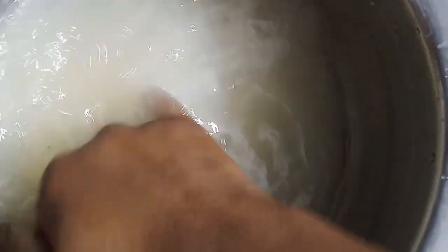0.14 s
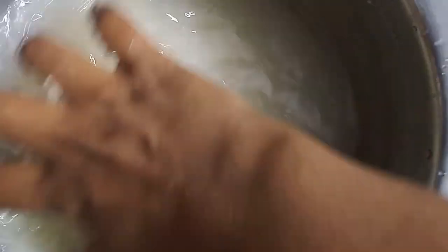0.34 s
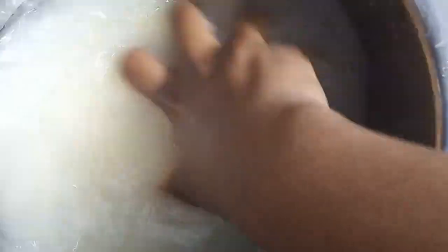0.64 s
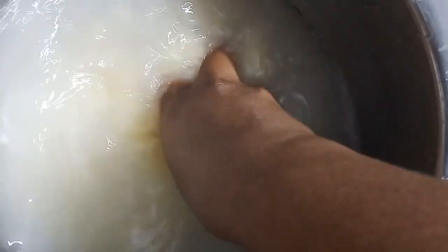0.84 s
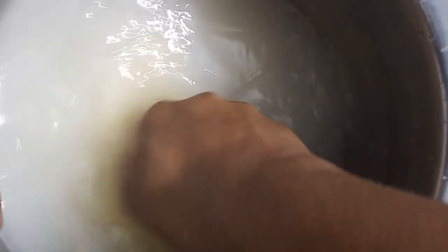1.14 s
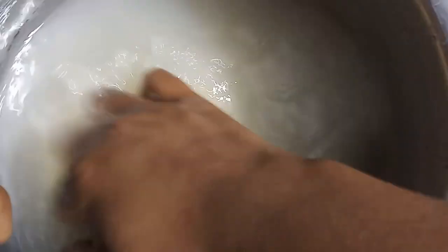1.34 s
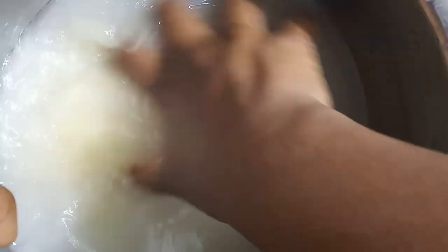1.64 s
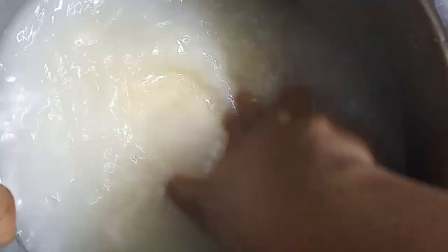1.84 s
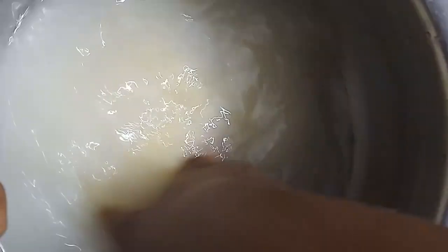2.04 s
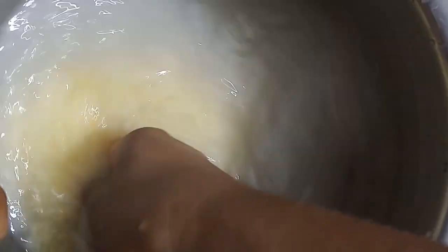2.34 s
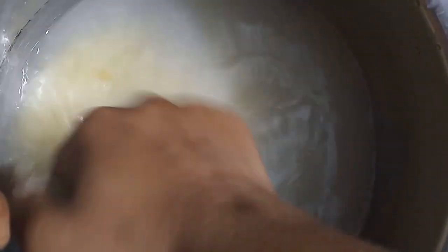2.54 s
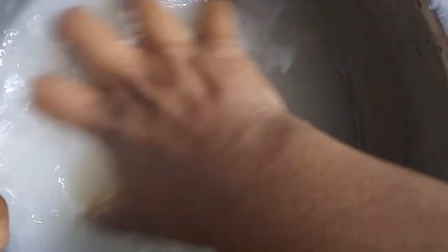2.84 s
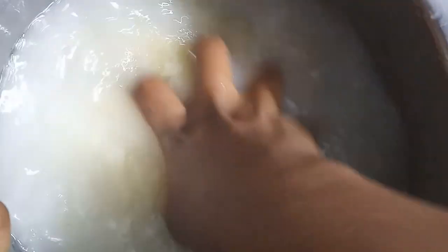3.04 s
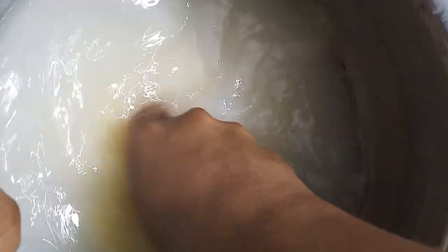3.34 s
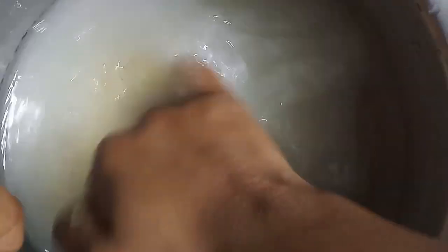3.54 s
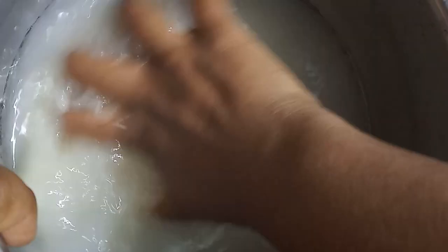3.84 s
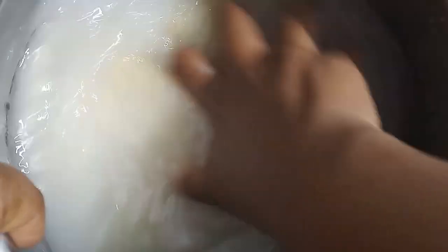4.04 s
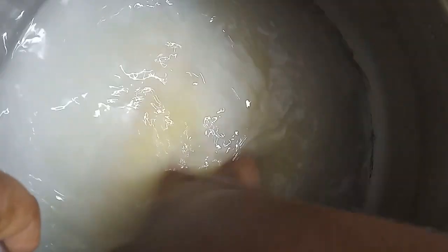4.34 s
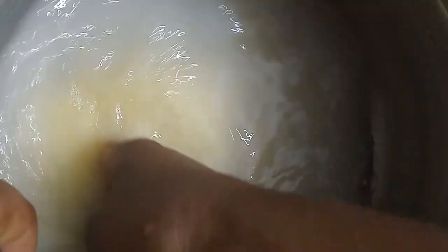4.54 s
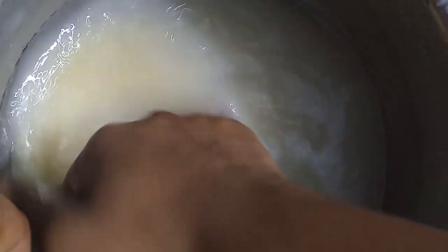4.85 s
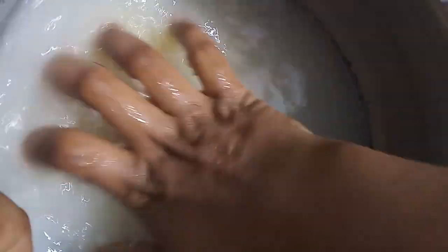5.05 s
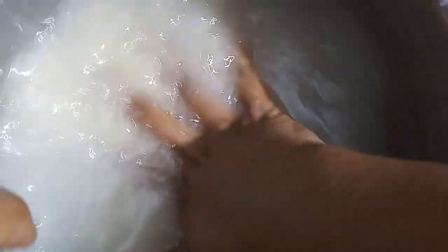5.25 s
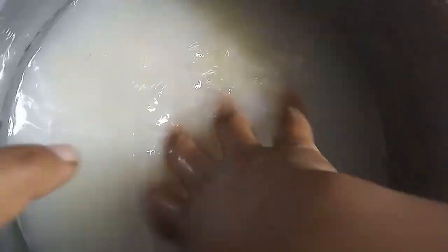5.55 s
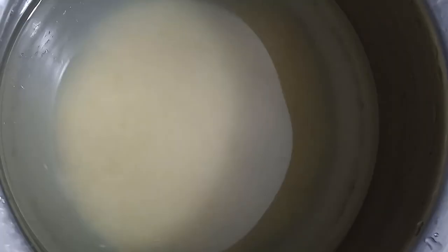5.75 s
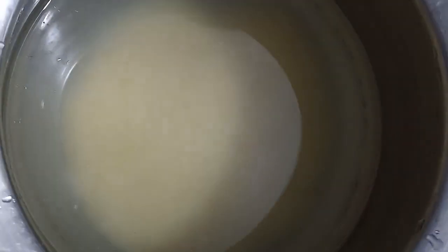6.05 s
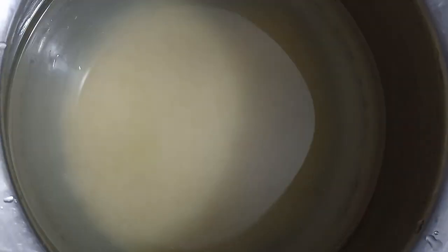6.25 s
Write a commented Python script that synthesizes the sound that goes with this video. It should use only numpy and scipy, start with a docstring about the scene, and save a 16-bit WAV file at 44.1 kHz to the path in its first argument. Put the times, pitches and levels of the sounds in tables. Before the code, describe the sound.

Wet rice grains rub and hiss as fingers sweep and squeeze them several times a second, with water churning, gurgling and plopping in a resonant metal pot. After about five seconds a bright tick, then a short loud click, and the movement stops. Only a low pulsing motor, faint far chirps and trills and a fine sizzle are left. Close, fairly dry microphone in a kitchen.

```python
"""Bubbles plop and drops smack as a hand swishes soaked rice in a metal pot of water; the grains hiss and rub.
Noise and grain clouds make the stirring, pitch-climbing damped sines the plops, and resonances the pot's drone.
A sharp tick comes late in the stirring; a short click ends it and leaves a thin ring.
A motor throbs in the kitchen as two beating tones, and faint chirps, trills and a thin sizzle follow the click."""
import sys
import numpy as np
from scipy import signal
from scipy.fft import rfft, irfft, next_fast_len
from scipy.io import wavfile
from scipy.ndimage import uniform_filter1d, map_coordinates

SR = 44100
rng = np.random.default_rng(int(sys.argv[2]) if len(sys.argv) > 2 else 0)


def dump(signal):
    """Clip the signal to [-1, 1] and save it as 16-bit WAV at the path in sys.argv[1]."""
    limited = np.clip(np.atleast_2d(signal).T, -1, 1)
    pcm = np.round(limited * 32767).astype(np.int16)
    wavfile.write(sys.argv[1], SR, pcm)


N = 282125


def amp(db):
    """Decibels to gain."""
    return 10 ** (np.asarray(db) / 20)


def unit(x):
    """Scale to rms 1."""
    return x / np.sqrt(np.mean(x ** 2) + 1e-20)


def clock(count=N):
    """Sample times in seconds."""
    return np.arange(count) / SR


def noise(count=N):
    """White noise."""
    return rng.standard_normal(count)


def curves(rows):
    """One value per sample for each column after the time."""
    seconds, *columns = np.transpose(rows)
    return [np.interp(clock(), seconds, column) for column in columns]


def wobble(rate, count=N, knots=400):
    """A smooth random curve, rate knots a second."""
    return map_coordinates(rng.standard_normal(knots), [clock(count) * rate], mode="wrap")


def filtered(x, response):
    """x times a response of frequency."""
    size = next_fast_len(len(x) + 8192)
    spectrum = rfft(x, size) * response(np.fft.rfftfreq(size, 1 / SR))
    return irfft(spectrum, size)[:len(x)]


def coloured(x, points):
    """x through a (Hz, dB) spectrum, at rms 1."""
    f, db = np.transpose(points)
    return unit(filtered(x, lambda hz: amp(np.interp(np.log(hz + 1), np.log(f), db))))


def resonate(x, modes):
    """x through band-pass resonances, each (Hz, width Hz, dB)."""
    def response(f):
        return sum(amp(db) * 1j * f * width / (hz * hz - f * f + 1j * f * width) for hz, width, db in modes)
    return filtered(x, response)


def add(track, s, sound):
    """Mix a sound in at time s."""
    start = max(round(s * SR), 0)
    part = track[start:start + len(sound)]
    part += sound[:len(part)]


def decay(t, t60):
    """Exponential fade, down 60 dB after t60 seconds."""
    return amp(-60 * t / t60)


def onset(t, attack):
    """Smooth rise from silence with a time constant in seconds."""
    return 1 - np.exp(-t / attack)


def gesture(start, length, attack, fade, sag_db_per_s=0):
    """Gain of one movement: it swells, holds while sagging, then dies away (20 dB per attack or fade time)."""
    age = clock() - start
    outside = np.maximum(-age, 0) / attack + np.maximum(age - length, 0) / fade
    return amp(-20 * np.minimum(outside, 10) - sag_db_per_s * np.clip(age, 0, length))


def together(gains):
    """Level in dB of unrelated sounds heard at once."""
    return 10 * np.log10(sum(g ** 2 for g in gains) + 1e-12)


def bubble(t, hz, t60, rise, attack, hold=1):
    """A damped air pocket climbs by rise octaves over one t60; with hold over 1 it sustains, then bursts."""
    age = t / np.maximum(t60, .002)
    pitch = hz * 2 ** (rise * np.minimum(age, 1))
    phase = 2 * np.pi * np.cumsum(pitch, axis=-1) / SR
    return np.sin(phase) * amp(-60 * age ** hold) * onset(t, attack)


def grains(mid_hz, octaves, cycles, spread_db, count=1000, size=256):
    """A cloud of tiny bubbles or grain contacts, a few much larger than the rest."""
    u = rng.random((count, 3))
    hz = mid_hz * 2 ** (octaves * (2 * u[:, 1:2] - 1))
    strength = amp(spread_db * np.minimum(-np.log(1 - u[:, 2:]), 4))
    waves = strength * bubble(clock(size), hz, cycles / hz, 0.13, 0.000092)
    where = (u[:, :1] * N).astype(int) + np.arange(size)
    return unit(np.bincount(where.ravel(), waves.ravel(), N)[:N])


def echoes(x, t60, count=16):
    """A diffuse random tail, drawn afresh for each equal stretch of sound."""
    t, out = clock(SR // 2), np.zeros(N)
    for part in np.array_split(np.arange(N), count):
        tail = noise(len(t)) * decay(t, t60) * onset(t, 0.0019)
        add(out, part[0] / SR, signal.fftconvolve(x[part], tail / np.linalg.norm(tail)))
    return out


# Motor tones. Each row: pitch in Hz, level in dB.
MOTOR_TONES = [(33.6, -71), (39.2, -58), (49.2, -63), (57.3, -55), (100, -52), (182, -72), (227, -71),
               (300, -71)]
# Drift between the two deep tones. Each row: time in seconds, beats gone by.
BEAT_COUNT = [(.02, 0), (5.2, 29), (5.65, 32), (6.39, 36)]
# Strength of the throb. Each row: time in seconds, relative level in dB.
THROB_STRENGTH = [(0, -8.5), (.7, -2.5), (1.5, -1.5), (2.05, -7), (3, -0.5), (4.1, -6.5), (5, -3), (5.7, 1),
                  (6.4, 1.5)]
# Colour of the room air. Each row: frequency in Hz, relative level in dB per Hz.
AIR_COLOUR = [(22, -18.5), (40, -6.5), (58, -3), (85, -2), (115, -9), (150, -16.5), (210, -16),
              (300, -18.5), (410, -28.5), (700, -29), (1000, -30), (3000, -38.5), (7000, -38.5),
              (16000, -44)]


def kitchen():
    """Room air is coloured noise; the motor is two beating deep tones and a hum whose lowest tones swell along."""
    t = clock()
    beats, = curves(BEAT_COUNT)
    throb_db, = curves(THROB_STRENGTH)
    shaft = 60.9 * t  # turns gone by
    throb = amp(-41.5) * (np.sin(2 * np.pi * shaft) + np.sin(2 * np.pi * (shaft + beats)))
    swell = np.abs(np.cos(np.pi * beats))
    throb = throb * swell ** 0.8 * amp(throb_db + .4 * wobble(5))
    hum = np.zeros(N)
    for hz, db in MOTOR_TONES:
        tone = amp(db) * np.sin(2 * np.pi * (hz * t + rng.random()))
        hum += tone * (swell if hz < 60 else 1)
    air = amp(-58.5 + 1.1 * wobble(7)) * coloured(noise(), AIR_COLOUR)
    return throb + hum * amp(1.1 * wobble(2.6)) + air


def chirp(length, hz, arch, rough):
    """One call that swells and fades while its pitch arches and quivers (both in octaves)."""
    swell = np.sin(np.linspace(0, np.pi, int(length * SR)))
    pitch = hz * 2 ** (arch * swell + rough * wobble(400, len(swell), knots=200))
    flutter = amp(2.5 * wobble(70, len(swell), knots=200))
    return swell * flutter * np.sin(2 * np.pi * np.cumsum(pitch) / SR)


# Distant chirps. Each row: start in seconds, length in seconds, pitch in Hz, arch in octaves, level in dB.
FAR_CHIRPS = [(5.585, .06, 1337, .05, -52), (5.665, .08, 1280, .24, -49), (5.865, .062, 1350, .04, -51.5),
              (5.942, .08, 1300, .2, -52), (6.019, .06, 2070, .081, -68), (6.202, .06, 1235, .05, -63)]
# Thin high trills. Each row: start in seconds, length in seconds, pitch in Hz, level in dB.
FAR_TRILLS = [(5.65, .14, 4800, -56), (5.8, .08, 4640, -58), (5.89, .1, 4850, -55), (6.0, .08, 4870, -55),
              (6.11, .1, 4850, -52), (6.23, .11, 4830, -53)]


def chirps():
    """Faint, slightly rough chirps and thin trills from far off, as sines with quivering pitch."""
    out = np.zeros(N)
    for s, length, hz, arch, db in FAR_CHIRPS:
        add(out, s, amp(db) * chirp(length, hz, arch, rough=.035))
    for s, length, hz, db in FAR_TRILLS:
        add(out, s, amp(db) * chirp(length, hz, arch=.03, rough=.025))
    return out


STOP_S = 5.47  # the stirring stops at the click
SIZZLE_DB, SIZZLE_ONSET_DB, SIZZLE_FADE_S = -63, -48, 0.15  # lasting level; level at first; time to fade by 20 dB


def sizzle():
    """After the click, resonant noise makes a thin wavering sizzle, with one soft puff of hiss."""
    t = clock()
    first = amp(SIZZLE_ONSET_DB) * gesture(STOP_S, 0.0197, .02, SIZZLE_FADE_S)
    sizzle_db = together([amp(SIZZLE_DB), first])
    modes = [(4750, 200, -6), (5280, 120, -6), (6240, 50, 1), (7070, 450, -4), (13150, 60, 8)]
    band = coloured(resonate(noise(), modes), [(3800, -28.5), (4600, 7.5), (7400, -2), (8500, -17)])
    thin = band * amp(sizzle_db + 3.18 * wobble(25)) * np.interp(t, [5.46, 5.55], [0, 1])
    puff = coloured(noise(), [(1800, -26), (3100, 8.5), (4200, -3), (7000, 1), (9000, -10.0), (16000, -18)])
    return thin + amp(-52) * puff * np.interp(t, [5.905, 5.93, 5.99], [0, 1, 0])


# Ring after the click. Each row: pitch in Hz, relative level in dB, time to fade by 60 dB in seconds.
CLICK_RING = [(1856, -24, 0.6), (3960, -12, 0.31), (4274, -30, 0.31), (5340, 2, 0.26), (5300, -7, 0.54),
              (5560, -7, 0.44), (5900, -11, 0.35)]


def click():
    """A short hollow click of damped tones and a noise crack leaves a thin ring, blurred by random phase."""
    out, t = np.zeros(N), clock(SR // 2)
    crack = coloured(noise(len(t)), [(300, -20.5), (1000, 10.5), (3000, -6.0), (8000, -14), (16000, -25.0)])
    knock = bubble(t, 1110, 0.022, 0, .0001) + 0.27 * crack * decay(t, 0.044)
    add(out, 5.461, amp(-11) * knock)
    cut_short = np.interp(t, [.008, .009], [1, 0])
    add(out, 5.464, amp(-12.5) * bubble(t, 1077, 0.14, 0.53, 0.0011) * cut_short)
    for hz, db, t60 in CLICK_RING:
        blur = 1.9 * np.interp(t, np.linspace(0, .5, 70), noise(70))  # radians
        add(out, 5.4725, amp(db - 33.5) * decay(t, t60) * np.sin(2 * np.pi * hz * t + blur))
    return out


# Colour of the tick. Each row: frequency in Hz, relative level in dB per Hz.
TICK_COLOUR = [(1000, -47), (3500, -13.5), (5200, 3), (6600, 6), (8300, -9.5), (11000, 3.5), (12200, 0),
               (13500, -21.5), (16000, -16)]


def tick():
    """One hard, bright tick as the hand opens: a noise burst with a fast fall and a weaker slow one."""
    out, t = np.zeros(N), clock(5000)
    fall = decay(t, .016) + amp(-11.5) * decay(t, .08)
    add(out, 5.0455, amp(-10) * coloured(noise(len(t)), TICK_COLOUR) * fall * onset(t, .0002))
    return out


def stirring_on():
    """1 until the click, then 0."""
    return np.clip((STOP_S - clock()) / .02, 0, 1)


# Fingers sweep through the rice. Each row: start in seconds, length in seconds, level in dB,
# time to fade by 20 dB in seconds.
FINGER_SWEEPS = [(0.0, .22, -35.5, 0.17), (0.324, .12, -32.5, .2), (0.527, 0.11, -36.5, 0.19),
                 (0.834, 0.028, -42.5, 0.16), (1.07, .04, -46.5, .15), (1.176, .08, -38.5, .1),
                 (1.332, 0.021, -30.5, 0.22), (1.455, 0.23, -33.5, 0.2), (1.823, 0.016, -36, 0.26),
                 (1.959, 0.075, -38.5, 0.4), (2.046, 0.134, -35.5, 0.55), (2.422, 0.42, -40, .2),
                 (2.842, 0.11, -33, 0.28), (3.079, 0.045, -38.5, 0.12), (3.312, 0.15, -40.5, 0.8),
                 (3.568, 0.043, -30.5, 0.2), (3.733, .04, -34.5, 0.4), (3.88, 0.34, -40, 1.1),
                 (4.208, 0.062, -33, 0.4), (4.465, .14, -34.5, 0.34), (4.809, 0.11, -37.5, .15),
                 (5.016, 0.017, -37.5, 0.27), (5.15, 0.17, -48, 0.25)]
SWEEP_ATTACK_S, SWEEP_SAG_DB_PER_S = 0.056, 4.5  # the fingers bite, then the rice gives way
FIRM_DB = -34  # level in the sweep table that counts as firm


def effort():
    """How hard the fingers work the rice, in dB over a firm sweep."""
    sweeps = [amp(db) * gesture(s, length, SWEEP_ATTACK_S, fade, SWEEP_SAG_DB_PER_S)
              for s, length, db, fade in FINGER_SWEEPS]
    return together(sweeps) - FIRM_DB


# Rice dragged over the bottom. Each row: start in seconds, length in seconds, level in dB.
BOTTOM_DRAGS = [(0.43, 0.054, -55.5), (0.611, 0.099, -49.5), (0.835, 0.15, -44.5), (1.239, 0.026, -55.5),
                (1.47, 0.18, -52.5), (1.756, 0.064, -43.5), (2.1, 0.044, -59), (2.317, 0.17, -53.5),
                (2.63, 0.39, -58), (3.137, 0.14, -44), (3.299, 0.05, -53.0), (3.506, 0.479, -52.5),
                (4.065, 0.2, -54.0), (4.27, 0.084, -48), (4.383, 0.12, -58.5), (5.086, 0.014, -57),
                (5.361, 0.047, -40.5)]
# Modes of the water-loaded base. Each row: pitch in Hz, width in Hz, relative level in dB.
BASE_MODES = [(301.3, 4.8, 5.5), (316, 10, -2), (335, 14, 0), (438, 10, -15)]
DRAG_ATTACK_S, DRAG_FADE_S, DRAG_SAG_DB_PER_S = .04, 0.075, 6.5
SHAKE_DB, SHAKE_GROWS = -63.5, 0.77  # the base shakes a little under every sweep; dB per dB of effort


def drone():
    """Dragged grains shake the base of the pot: noise through its low resonances."""
    drags = [amp(db) * gesture(s, length, DRAG_ATTACK_S, DRAG_FADE_S, DRAG_SAG_DB_PER_S)
             for s, length, db in BOTTOM_DRAGS]
    drag_db = together([amp(SHAKE_DB + SHAKE_GROWS * effort())] + drags)
    shake = coloured(resonate(noise(), BASE_MODES), [(180, -23.5), (290, 8), (480, 0.0), (900, -23.5)])
    return shake * amp(drag_db) * stirring_on()


# Air pockets under the hand. Each row: start in seconds, length in seconds, low pitch in Hz, high pitch in Hz,
# low level in dB, high level in dB.
HAND_HOLLOWS = [(.075, .06, 980, 1600, -50, -49), (.35, .22, 1250, 1620, -58.5, -52.5),
                (1.29, .06, 1060, 1320, -51, -58), (1.53, .17, 883, 1420, -55, -57),
                (2.13, .1, 1100, 1570, -49, -51), (2.25, .1, 1100, 1570, -66, -58),
                (2.56, .2, 1050, 1680, -72, -54), (3.45, .16, 1010, 1600, -56, -55),
                (3.7, .2, 937, 1630, -50, -47.5), (3.97, .37, 1370, 1850, -66, -72),
                (4.38, .07, 1140, 1620, -57, -60), (4.53, .15, 1050, 1710, -48, -44),
                (4.85, .2, 1000, 1720, -66, -53), (5.28, .09, 1700, 3250, -63, -66),
                (5.4, .04, 1750, 2200, -68, -60)]
HOLLOW_WIDTH_HZ, HOLLOW_ATTACK_S, HOLLOW_FADE_S, HOLLOW_SAG_DB_PER_S = 35, .025, .055, 10
HOLLOW_FLUTTER_DB = 2.2  # the flow comes in lumps


def hollows():
    """The hand shuts in a different pocket of air on every pass, and running water keeps it ringing."""
    def ring(hz):
        narrow = resonate(noise(), [(hz, HOLLOW_WIDTH_HZ, 0)])
        return unit(resonate(narrow, [(hz, 200, 0)]) * amp(HOLLOW_FLUTTER_DB * wobble(32)))
    out = np.zeros(N)
    for s, length, low_hz, high_hz, low_db, high_db in HAND_HOLLOWS:
        swell = gesture(s, length, HOLLOW_ATTACK_S, HOLLOW_FADE_S, HOLLOW_SAG_DB_PER_S)
        out += swell * (amp(low_db) * ring(low_hz) + amp(high_db) * ring(high_hz))
    return out * stirring_on()


# Bubbles spitting between the fingers. Each row: start in seconds, relative level in dB, pitch in Hz.
FINGER_SPITS = [(.0423, -19, 7420), (.1156, -21, 10200), (.3586, -22, 7470), (1.2511, -21, 7360),
                (1.281, -18, 8900), (1.3259, -23, 7350), (2.5112, -26, 10500), (2.57, -27, 9000),
                (3.3353, -17, 12400), (3.4116, -24, 10500), (3.472, -26, 9300), (3.4979, -24, 10400),
                (3.546, -16, 12500), (3.582, -22, 9000), (4.6294, -24, 9000), (4.7935, -27, 12000),
                (4.809, -26, 10500), (5.024, -24, 12000)]


def spits():
    """Tiny bubbles burst in short, bright puffs of resonant noise."""
    out, t = np.zeros(N), clock(2000)
    for s, db, hz in FINGER_SPITS:
        burst = unit(resonate(noise(len(t)), [(hz, 2200, 0)]))
        add(out, s, amp(db - 6) * burst * decay(t, .022) * onset(t, .0003))
    return out


# Air in the pot. Each row: pitch in Hz, width in Hz, relative level in dB.
POT_AIR = [(926, 48, -10), (1035, 24, -5.5), (1156, 54, -7.5), (1362, 40, -12), (1601, 54, -4),
           (1717, 35, -5), (1929, 54, -2.5), (2111, 60, -2), (2290, 70, 1.5), (2467, 66, -2),
           (2705, 55, -3.5), (2960, 45, -5.5), (3224, 64, -3), (3640, 50, -1), (3923, 120, -2.5),
           (4336, 100, -1.5), (6600, 400, -16)]


def in_pot(x, wet_db):
    """The air in the pot rings at its own pitches."""
    return x + amp(wet_db) * resonate(x, POT_AIR)


def scatter(x, t60, count=5000):
    """The diffuse answer of the walls to one splash, as strong as the splash itself."""
    t = clock(count)
    walls = noise(count) * decay(t, t60) * onset(t, 0.0025)
    tail = signal.fftconvolve(x, walls)[:len(x)]
    return tail * np.linalg.norm(x) / np.linalg.norm(tail)


def droplets(t, hz, octaves, count=7):
    """A ragged spatter of small bubbles around a pitch, at scattered delays; later ones are weaker on average."""
    u = rng.random((count, 3))
    late = np.maximum(t - .022 * u[:, :1] ** 2, 0)
    pitch = np.minimum(hz * 2 ** (octaves * (2 * u[:, 1:2] - .7)), SR / 3)
    size = amp(-12 * u[:, :1] - 15 * u[:, 2:])
    return np.sum(size * np.sin(2 * np.pi * pitch * late) * decay(late, 0.053), axis=0)


# Air pockets closing. Each row: start in seconds, relative level in dB, pitch in Hz,
# time to fade by 60 dB in seconds, hold (1 fades evenly, more sustains and then bursts).
POCKET_PLOPS = [(.03, -8.5, 2433, .02, 1.2), (.078, -27, 1500, .03, 1), (.094, -24, 1950, .025, 1),
                (.122, -13, 2446, .03, 1.2), (.13, -15, 1847, .026, 2), (.193, -6, 1340, .016, 1.2),
                (.393, -9.5, 1180, .022, 1.2), (1.134, -27, 2200, .035, 1.2), (1.164, -22, 2385, .018, 1.2),
                (1.178, -21, 2400, .018, 1), (1.208, -24, 1560, .028, 1), (1.239, -10, 2400, .035, 1.2),
                (1.24, -16, 1850, .025, 1.2), (1.292, -19, 1020, .03, 1.6), (1.44, -20, 1640, .024, 1.2),
                (1.507, -15, 1317, .023, 1.4), (1.573, -17, 1690, .022, 1.2), (1.7, -27, 2080, .03, 1.5),
                (2.04, -29, 1745, .04, 1.2), (2.096, -31, 1480, .03, 1.2), (2.129, -9.5, 2120, .022, 2.5),
                (2.147, -22, 1680, .025, 1.2), (2.205, -24, 1900, .025, 1.2), (2.274, -18, 2500, .025, 1.2),
                (2.455, -33, 1640, .04, 1.5), (2.56, -21, 2400, .02, 1.2), (2.577, -19.5, 1674, .021, 1.2),
                (2.739, -19.5, 1824, .021, 1.2), (2.797, -12.5, 2515, .026, 1.2),
                (3.45, -10.5, 2440, .016, 1.2), (3.463, -18, 1860, .018, 1.2), (3.515, -18, 2520, .02, 1.2),
                (3.54, -8.5, 1580, .019, 1.2), (3.547, -14, 1100, .026, 1.2), (3.583, -17, 1502, .03, 1.6),
                (3.613, -15.5, 2485, .039, 1.2), (3.612, -24, 1120, .035, 1.2),
                (3.716, -23, 2440, .03, 1.2), (3.809, -16.5, 1070, .022, 1.2), (3.819, -22, 1440, .06, 1.1),
                (4.001, -24, 1570, .026, 4), (4.418, -29, 1170, .045, 1.8), (4.5005, -12, 1008, .02, 2.5),
                (4.5325, -2.5, 1640, .022, 4), (4.548, -10.5, 2310, .031, 1.2),
                (4.555, -18, 1700, .04, 1.5), (4.605, -9, 1620, .025, 1.6), (4.619, -21, 1900, .03, 1.2),
                (4.653, -21, 1200, .025, 1.2), (4.792, -21, 2330, .03, 1.2), (4.858, -25, 1050, .025, 1.2),
                (4.86, -13.5, 1774, .03, 1.2), (5, -20, 1754, .027, 1.2), (5.021, -14.5, 2545, .019, 1.2)]
# Drops and wet fingers on the surface. Each row: start in seconds, relative level in dB, pitch in Hz,
# relative splat level in dB.
SURFACE_SMACKS = [(.019, -21, 2700, -10), (0.0307, -10, 4160, -8), (.1189, -11.5, 6120, -0.5),
                  (0.1609, -17, 2840, -13), (.31, -26, 3100, -10), (.3244, -23, 3700, -8),
                  (1.4935, -22, 3880, -12), (1.052, -29, 4080, -8), (1.1764, -19.5, 5300, -7),
                  (1.1937, -17, 4240, -4), (1.2516, -8, 3850, -8), (1.9732, -10, 4040, -12),
                  (2.155, -8, 3444, -7), (2.1797, -11.5, 4780, -14.5), (2.2548, -21, 3700, -6),
                  (2.274, -21.5, 3990, -5.5), (2.2884, -21, 2970, -8), (2.4853, -24, 5110, -12),
                  (2.5191, -16.5, 3890, -9), (2.528, -14.5, 4430, -7.5), (2.7087, -16.5, 3270, -6.5),
                  (2.7872, -14, 3490, -3.5), (3.2883, -18.5, 3175, -13.5), (3.3355, -15, 6500, -4),
                  (3.419, -15, 4130, -6), (3.5396, -7, 6780, -4), (3.58, -15, 3500, -10),
                  (3.5906, -11, 3450, -9), (3.613, -11, 3970, -6), (3.7432, -8.5, 6650, -7),
                  (3.8088, -11.5, 6570, -6.5), (3.8701, -26, 4000, -9), (3.9098, -21, 3670, -9.5),
                  (4.0017, -17.5, 3670, -7), (4.0243, -18, 3660, -8), (4.4978, -9, 3390, -12.5),
                  (4.5247, -12, 7630, -15.5), (4.5466, -14.5, 6350, -5.5), (4.5879, -7.5, 4920, -14),
                  (4.668, -12.5, 4510, -9), (4.8639, -5, 6700, -13), (4.9007, -18.5, 5600, -11),
                  (4.9548, -17.5, 4560, -11.5), (5.0068, -10.5, 5710, -13), (5.0853, -23, 3350, -14)]
# Colour of a splat. Each row: frequency in Hz, relative level in dB per Hz.
SPLAT_COLOUR = [(600, -41), (1300, -25), (2500, 1), (4000, 12), (7000, 13.5), (8500, 4), (12000, 3.5),
                (16000, -9.5)]
RISE_OCTAVES_PER_S = 4.0  # every plopping pocket climbs in pitch as it nears the surface
SPLASH_LOW_HZ = 790  # the air in the pot carries little deeper


def splashes():
    """Large bubbles plop and drops smack; each throws off smaller bubbles and rings in the pot."""
    out, t = np.zeros(N), clock(6000)
    for s, db, hz, t60, hold in POCKET_PLOPS:
        pop = coloured(noise(len(t)), [(.55 * hz, -35), (.9 * hz, 0), (1.9 * hz, -3), (4 * hz, -28)])
        pop = pop * decay(t, .026) * onset(t, .0012)
        pocket = bubble(t, hz, t60, RISE_OCTAVES_PER_S * t60, 0.0013, hold)
        plop = pocket + 0.11 * droplets(t, hz, octaves=0.58) + amp(-12) * pop
        add(out, s, amp(db - 4.5) * (plop + amp(-12) * scatter(plop, t60=0.071)))
    for s, db, hz, splat_db in SURFACE_SMACKS:
        splat = coloured(noise(len(t)), SPLAT_COLOUR) * decay(t, 0.015) * onset(t, 0.00021)
        pocket = 0.75 * bubble(t, hz, 0.014, 0.029, 0.00086)
        smack = pocket + 0.1097 * droplets(t, hz, octaves=.55) + 0.69 * amp(splat_db) * splat
        add(out, s, amp(db + 2) * (smack + amp(-3) * scatter(smack, t60=0.035)))
    low_cut = signal.butter(5, SPLASH_LOW_HZ, "high", fs=SR, output="sos")
    return signal.sosfilt(low_cut, in_pot(out, wet_db=-6))


def patchy(x, depth_db):
    """x with drifting patches of louder and softer frequencies."""
    z = signal.stft(x, nperseg=512)[2]
    smooth = uniform_filter1d(rng.standard_normal(z.shape), size=5, axis=0)  # across frequency
    field = uniform_filter1d(smooth, size=9, axis=1)  # across time
    return signal.istft(z * amp(depth_db * unit(field)), nperseg=512)[1][:N]


# The hand shoves water around the pot. Each row: start in seconds, length in seconds,
# relative deep slosh level in dB, light churn level in dB.
WATER_SURGES = [(0.028, .18, -46, -38), (0.391, 0.071, -46, -43), (2.06, .05, -58, -44),
                (3.066, 0.1, -60.5, -54), (1.213, 0.1, -40, -36), (1.485, 0.18, -52, -42),
                (2.132, .09, -49, -37.5), (2.523, 0.11, -50.5, -39.5), (2.746, 0.025, -54, -42.5),
                (3.455, 0.033, -46, -39), (3.539, 0.064, -36, -33), (3.723, 0.18, -49, -43.5),
                (4.006, .03, -57, -41), (4.403, .04, -52, -46), (4.534, .02, -34, -33),
                (4.6, .06, -38, -36.5), (4.798, 0.21, -51, -36.5), (5.386, 0.069, -60, -65)]
# Water squirts out of the closing fist. Each row: start in seconds, level in dB.
FIST_SQUIRTS = [(.035, -34), (.2, -40.5), (.35, -42), (1.27, -40), (1.325, -35), (2.525, -44.5),
                (2.62, -45.5), (3.335, -41), (3.499, -43.5), (4.8, -45)]
# Colours of rubbed rice, spray, churn and slosh. Each row: frequency in Hz, relative level in dB per Hz.
RICE_COLOUR = [(2200, -40), (3500, -17), (4300, -11.5), (4850, -2.5), (5600, -2.5), (6600, 2.5),
               (7600, 0.5), (8500, -12), (11000, -18), (16000, -30.5)]
SPRAY_COLOUR = [(6000, -35), (8500, 0), (10000, 3), (12000, -7), (14000, -2.5), (16000, -16.5)]
CHURN_COLOUR = [(1300, -35), (1900, -12.5), (2200, -2.5), (2500, 1.5), (3000, 6.5), (3600, 1), (4300, 6),
                (6000, -19.5), (9000, -51)]
SLOSH_COLOUR = [(620, -44), (770, -20.5), (900, -3), (1100, -4), (1350, 1.5), (1650, 9), (1900, 4),
                (2400, -10.5), (3500, -49.5)]
SPRAY_DB, SPRAY_GROWS = -50, 1.4  # fine spray of a firm sweep; dB per dB of effort
WAKE_DB, WAKE_GROWS = -45.5, 1.37  # water churned in its wake; dB per dB of effort
LAP_DB, SLOSH_OFFSET_DB = -71, -3.0  # relative level of deep lapping in a firm sweep; slosh level offset in dB
SURGE_ATTACK_S, SURGE_SAG_DB_PER_S = 0.032, 10.5
SLOSH_FADE_S, CHURN_FADE_S = 0.13, 0.19  # time to settle by 20 dB
SQUIRT_ATTACK_S, SQUIRT_HOLD_S, SQUIRT_FADE_S = 0.0088, 0.011, 0.042


def stirring():
    """Rice rubs on skin and steel while water sprays, churns and sloshes: grain clouds and noise, coloured."""
    def surge(s, length, fade):
        return gesture(s, length, SURGE_ATTACK_S, fade, SURGE_SAG_DB_PER_S)
    effort_db = effort()
    squirts = [amp(db) * gesture(s, SQUIRT_HOLD_S, SQUIRT_ATTACK_S, SQUIRT_FADE_S) for s, db in FIST_SQUIRTS]
    churns = [amp(db) * surge(s, length, CHURN_FADE_S) for s, length, _, db in WATER_SURGES]
    sloshes = [amp(db) * surge(s, length, SLOSH_FADE_S) for s, length, db, _ in WATER_SURGES]
    rub_db = FIRM_DB - 0.5 + effort_db
    spray_db = together([amp(SPRAY_DB + SPRAY_GROWS * effort_db)] + squirts)
    churn_db = together([amp(WAKE_DB + WAKE_GROWS * effort_db)] + churns)
    slosh_db = together([amp(LAP_DB + effort_db)] + sloshes) + SLOSH_OFFSET_DB
    # patches of louder and softer frequencies drift at random through the grains
    contacts = grains(6500, 1.58, 22, 3.9, count=9000, size=256)
    crackle = patchy(contacts + 1.15 * noise(), depth_db=2.5)
    rub = coloured(crackle, RICE_COLOUR) * amp(rub_db + 1.1 * wobble(40))
    spray = coloured(crackle, SPRAY_COLOUR) * amp(spray_db + 1.2 * wobble(45))
    # moving water is heard mostly through the fixed pitches of the pot; small bubbles ring on top
    froth = grains(3000, .8, 30, 3.0, count=5000, size=400) + 1.1 * noise()
    plips = grains(2900, 0.65, 36, 5, count=700, size=1400)
    water = unit(in_pot(froth, wet_db=15.0)) + 0.3 * plips
    churn = coloured(water, CHURN_COLOUR) * amp(churn_db + 2.1 * wobble(35))
    gurgle = grains(1350, 0.63, 33, 2.495, count=1600, size=800) + .8 * noise()
    slosh = coloured(in_pot(gurgle, wet_db=25.5), SLOSH_COLOUR) * amp(slosh_db + 1.8 * wobble(28))
    return (rub + spray + churn + slosh) * stirring_on()


def scene():
    """The pot is close and nearly dry; the kitchen answers faintly."""
    near, far = splashes() + spits() + tick(), chirps()
    room = amp(-11) * echoes(near, 0.15) + amp(-4) * echoes(far, 0.19)
    background = kitchen() + far + room + sizzle()
    pot = click() + drone() + hollows() + near + stirring()
    return (background + pot)[None]


TOP_HZ = 16200  # band limit


def record(dry):
    """Nothing is kept above the band limit."""
    return filtered(dry[0], lambda hz: hz < TOP_HZ)[None]


dry = scene()
out = record(dry)
dump(out)
```